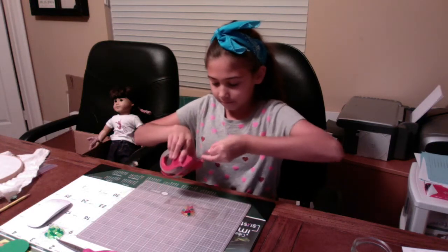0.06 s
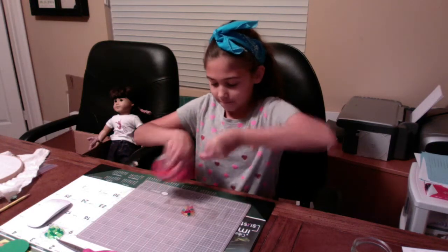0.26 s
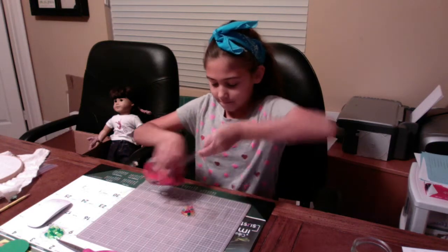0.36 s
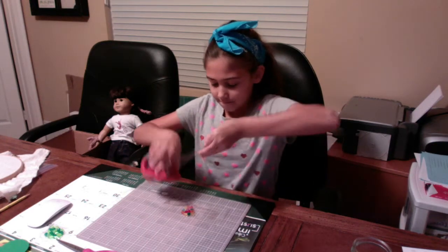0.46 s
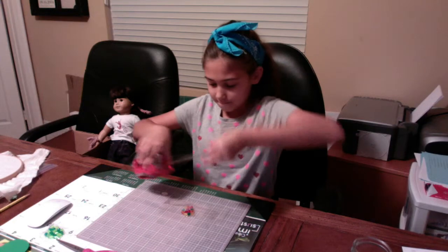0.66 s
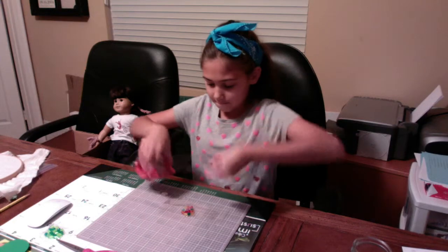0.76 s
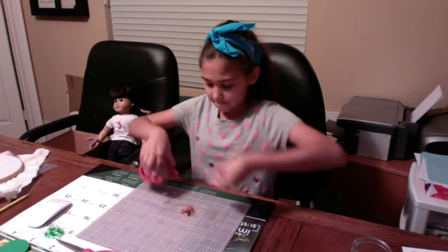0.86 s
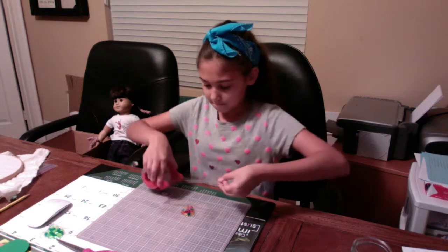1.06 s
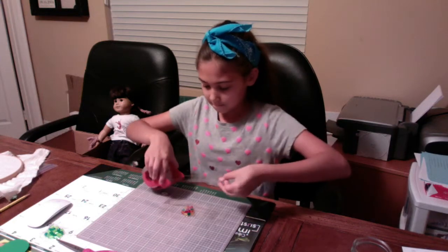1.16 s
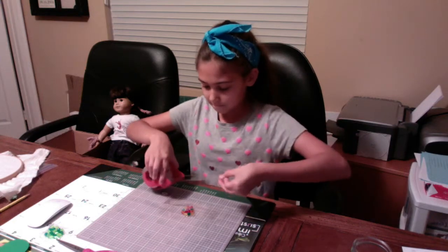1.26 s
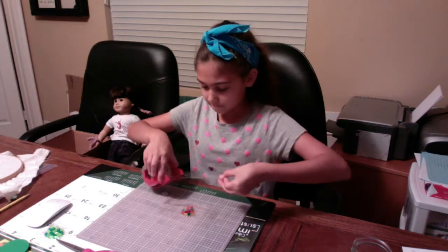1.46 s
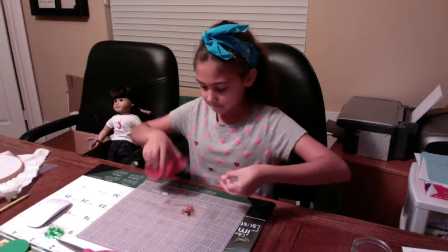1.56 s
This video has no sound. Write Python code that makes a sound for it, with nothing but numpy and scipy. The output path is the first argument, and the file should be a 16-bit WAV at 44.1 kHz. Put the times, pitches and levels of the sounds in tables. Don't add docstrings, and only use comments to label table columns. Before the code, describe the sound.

Adhesive tape tears off a plastic dispenser: a faint creak, one loud raspy pull, a cluster of jerks, then two brief crackly bursts, in a small echoing room, close laptop microphone slightly overloaded.

```python
import sys
import numpy as np
from scipy import signal
from scipy.fft import rfft, irfft
from scipy.io import wavfile
from scipy.ndimage import uniform_filter1d, map_coordinates

SR = 44100
rng = np.random.default_rng(int(sys.argv[2]) if len(sys.argv) > 2 else 0)


def linear_from_db(decibels):
    return 10 ** (np.asarray(decibels, float) / 20)


def bounce(signal):
    frames = np.transpose(np.atleast_2d(signal))
    limited = np.clip(frames, -1, 1)
    pcm = np.round(limited * 32767).astype(np.int16)
    wavfile.write(sys.argv[1], SR, pcm)


N = 70560


def curve(table):
    s, db = np.array(table).T
    return linear_from_db(np.interp(np.arange(N) / SR, s, db, left=-200, right=-200))


def unit(x):
    return x / np.sqrt(np.mean(x ** 2))


def unit_energy(h):
    return h / np.sqrt(np.sum(h ** 2))


def on_log(table, hz):
    f, v = np.array(table).T
    return np.interp(np.log(np.maximum(hz, 1)), np.log(f), v)


def convolve(x, h):
    return signal.fftconvolve(x, h)[:len(x)]


def colour(table, size=2048):
    gain = linear_from_db(on_log(table, np.fft.rfftfreq(size, 1 / SR)))
    cepstrum = irfft(np.log(gain))
    cepstrum[1:size // 2] *= 2
    cepstrum[size // 2 + 1:] = 0
    return unit_energy(irfft(np.exp(rfft(cepstrum))))


def modes(table, size):
    t = np.arange(size) / SR
    return sum(linear_from_db(db - 60 * t / t60) * np.sin(2 * np.pi * hz * t) for hz, db, t60 in table)


def band(x, hz, width_hz):
    edge = [max(hz - width_hz / 2, 10), min(hz + width_hz / 2, .49 * SR)]
    return signal.sosfilt(signal.butter(2, edge, "band", fs=SR, output="sos"), x)


def noise_band(hz, width_hz):
    return unit(band(rng.standard_normal(N), hz, width_hz))


def walk(rate_hz):
    z = rng.standard_normal(4096)
    return unit(map_coordinates(z, [np.arange(N) / SR * rate_hz], order=1, mode="wrap"))


def cracks():
    cracks_per_s, spread_db = 26000, 1.6
    happens = rng.random(N) < cracks_per_s / SR
    size = linear_from_db(spread_db * rng.exponential(size=N))
    sign = np.sign(rng.standard_normal(N))
    return unit(happens * sign * size)


def room_tone():
    # frequency in Hz, level in dB per Hz.
    floor = [(30, -38), (60, -18.5), (140, -9.5), (260, -19), (500, -20), (1340, -30.5), (4000, -34),
             (15000, -45)]
    floor_db = -70
    out = 0
    for hz in 40 * 2 ** np.arange(0, 8.6, .5):
        noise = noise_band(hz, hz * .35)
        waver_db = 2.5 * walk(12) * (hz < 400)
        out = out + noise * np.sqrt(hz) * linear_from_db(on_log(floor, hz) + waver_db)
    return linear_from_db(floor_db) * unit(out)


def appliance_hum():
    # frequency in Hz, level in dB.
    lines = [(60, -99), (120, -80), (242, -76.5), (1359, -75.5)]
    t = np.arange(N) / SR
    return sum(linear_from_db(db + 3.4 * walk(25)) * np.sin(2 * np.pi * hz * t) for hz, db in lines)


def earlier_tick():
    # frequency in Hz, level in dB, time to fade by 60 dB in seconds.
    rings = [(4940, -59, 0.099), (5770, -69, 0.086), (6120, -61, .15), (6780, -82, 0.11),
             (10500, -60, 0.068)]
    tail_db, tail_t60_s = -62.5, .25
    t = np.arange(N) / SR
    tail = noise_band(5000, 9000) * linear_from_db(tail_db - 60 * t / tail_t60_s)
    ring = sum(linear_from_db(db - 60 * t / t60) * noise_band(hz, 140) for hz, db, t60 in rings)
    return ring + tail


def late_tick():
    start_s, level_db, t60_s = 1.497, -69, .048
    t = np.arange(N) / SR
    fade = linear_from_db(level_db - 60 * np.maximum(t - start_s, 0) / t60_s)
    return (t > start_s) * fade * noise_band(10300, 1500)


def jolt():
    centre_s, length_s, level_db = .790, .0015, -39.5
    t = np.arange(N) / SR
    return linear_from_db(level_db) * np.exp(-((t - centre_s) / length_s) ** 2)


def bumps():
    # centre in seconds, level in dB.
    swells = [
        (.19, -62),
        (0.592, -41.5),
        (.975, -56.5),
        (1.22, -63),
        (1.37, -59.5),
    ]
    hz, length_s = 128, .02
    t = np.arange(N) / SR
    swell = sum(linear_from_db(db) * np.exp(-((t - s) / length_s) ** 2) for s, db in swells)
    return swell * np.sin(2 * np.pi * hz * t)


def rustle():
    # time in seconds, level in dB.
    friction = [
        (.93, -73),
        (.97, -63),
        (1.0, -66.5),
        (1.05, -80),
        (1.06, -90),
    ]
    patches = linear_from_db(4.4 * walk(140))
    return curve(friction) * patches * unit(band(cracks(), 4700, 7700))


def creep():
    # time in seconds, level in dB.
    tension = [
        (.170, -84),
        (.186, -63.5),
        (.200, -56.5),
        (.218, -50),
        (.222, -78),
    ]
    low_db = -12
    crackle = cracks()
    creak = unit(band(crackle, 10600, 4000)) + linear_from_db(low_db) * unit(band(crackle, 2900, 1500))
    return curve(tension) * linear_from_db(2.5 * walk(420)) * creak


def long_pull(crackle):
    # time in seconds, effort in dB.
    effort = [
        (.2330, -66),
        (.2336, -5),
        (.240, -6.5),
        (.260, -7.5),
        (.290, -5.5),
        (.330, -6),
        (.350, -13),
        (.372, -22.5),
        (.385, -39.5),
    ]
    stutter_hz, stutter_db = 251.2, 1.5
    return crackle * curve(effort) * linear_from_db(stutter_db * walk(stutter_hz))


def slips(crackle):
    # start in seconds, length in seconds.
    times = [(.2190, .001), (.2268, .0008), (.2305, .001), (.4952, .0045), (.5030, .0018), (.5110, .003),
             (.5150, .0015), (.5385, .0018), (.5430, .004), (.5510, .001), (.5580, .002), (.5768, .004),
             (.5870, .002), (.5990, .0015), (.7733, .0004), (.7803, .0005), (.7821, .0009), (.7898, .0009),
             (.7975, .001), (1.0582, .0008), (1.0650, .0018), (1.0715, .0009), (1.0780, .0012),
             (1.0855, .001), (1.0935, .0008)]
    strengths = [-29, -12, -16, -3, -7, -11, -8, -5, -4, -8, -10, -6, -13, -11, -13, -22, -9, -9, -16, -9,
                 -8.5, -10, -8.5, -12, -14]
    release_s = .0009
    t = np.arange(N) / SR
    force = np.zeros(N)
    for (start, length), db in zip(times, strengths):
        attack = np.clip((t - start) * SR / 4, 0, 1)
        gate = linear_from_db(db) * attack * np.exp(-np.maximum(t - start - length, 0) / release_s)
        burst = gate * crackle
        force = force + burst * np.sqrt(np.sum(gate ** 2) / np.sum(burst ** 2))
    return force


def shell(force):
    # frequency in Hz, level in dB, time to fade by 60 dB in seconds.
    shell_modes = [(818, -10.5, 0.0065), (1081, -9, 0.014), (1446, 5, .008), (1967, 8.5, 0.01),
                   (2273, 9.5, 0.013), (3150, -7.5, 0.0073), (4480, -4.5, 0.0041), (6113, -3, 0.03)]
    # time in seconds, shake of the shell in dB.
    grip = [(.2, -10), (.4, -1.5), (.5, -7.5), (.6, -2.5), (.77, -6.5), (.8, 4), (1.05, -13.5), (1.1, 9.5)]
    shell_db = -10
    shake = linear_from_db(np.interp(np.arange(N) / SR, *np.array(grip).T))
    ring = unit_energy(modes(shell_modes, size=4096))
    return linear_from_db(shell_db) * convolve(force * shake, ring)


def film(force):
    # frequency in Hz, gain in dB.
    film_colour = [(150, -49.5), (500, -28), (1300, -10), (3000, -6.5), (5500, -7.5), (8500, -3),
                   (11500, 2.5), (16000, -6.5)]
    return convolve(force, colour(film_colour))


def tape():
    crackle = cracks()
    force = long_pull(crackle) + slips(crackle)
    high_pass = signal.butter(5, 556, "high", fs=SR, output="sos")
    return signal.sosfilt(high_pass, film(force) + shell(force))


def room_response(size=30000):
    # frequency in Hz, time to fade by 60 dB in seconds.
    room_t60 = [(250, 0.49), (800, .33), (2000, 0.37), (5500, 0.46), (10000, 0.34), (15000, .29)]
    rise_s, sparse_s, room_db = .004, .006, -3.3
    table_s, table_db = .0027, -6.5
    t = np.arange(size) / SR
    dense = np.clip(t / sparse_s, 0, 1) ** 2 + .0013
    echoes = rng.standard_normal(size) * (rng.random(size) < dense) / np.sqrt(dense)
    hz, s, z = signal.stft(echoes, SR, nperseg=128)
    fade = linear_from_db(-60 * s / on_log(room_t60, hz)[:, None])
    tail = signal.istft(z * fade, SR, nperseg=128)[1][:size]
    tail = tail * (1 - np.exp(-(t / rise_s) ** 2))
    h = linear_from_db(room_db) * unit_energy(tail)
    h[0] += 1
    h[int(table_s * SR)] += linear_from_db(table_db)
    return h


def suppress(x):
    # frequency in Hz, threshold in dB.
    threshold = [(300, -65.5), (2000, -65), (8000, -61.5), (15000, -50.5)]
    depth_db = -16
    hz, _, z = signal.stft(x, SR, nperseg=128)
    power = uniform_filter1d(np.abs(z) ** 2, size=3, axis=0)
    power = uniform_filter1d(power, size=9, axis=1)
    level_db = 10 * np.log10(np.abs(power) + 1e-16)
    under_db = np.minimum(level_db - on_log(threshold, hz)[:, None], 0)
    return signal.istft(z * linear_from_db(np.maximum(under_db, depth_db)), SR, nperseg=128)[1][:N]


def scene():
    pulled = suppress(convolve(tape(), room_response()))
    small = creep() + earlier_tick() + late_tick() + jolt() + bumps()
    background = room_tone() + appliance_hum()
    return (pulled + small + background + rustle())[None]


def band_limit(x):
    return signal.sosfilt(signal.butter(12, 16530, fs=SR, output="sos"), x)


def record(dry):
    gain_db, ceiling_db, knee = 4.42, -.8, 12
    x = dry * linear_from_db(gain_db)
    x = linear_from_db(ceiling_db) * x / (1 + np.abs(x) ** knee) ** (1 / knee)
    x = signal.sosfilt(signal.ellip(8, .2, 36, 15750, fs=SR, output="sos"), x)
    return band_limit(x)


dry = scene()
out = record(dry)
bounce(out)
```